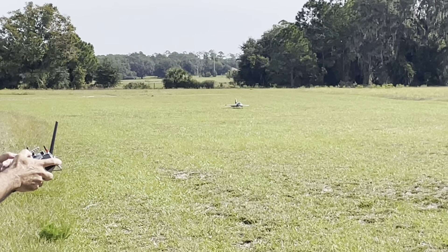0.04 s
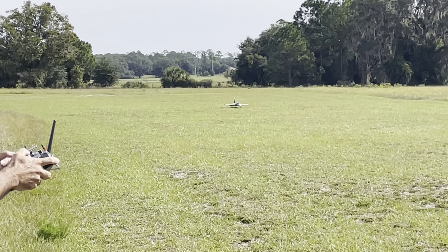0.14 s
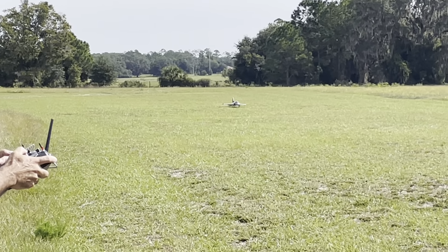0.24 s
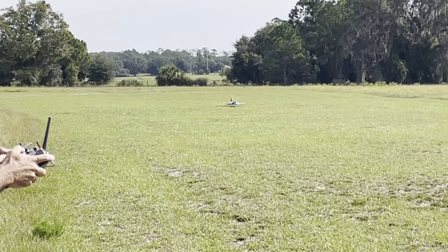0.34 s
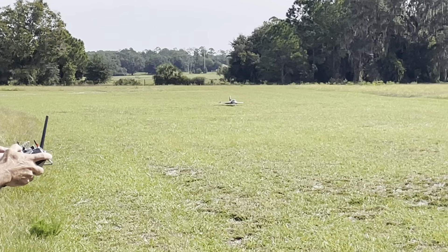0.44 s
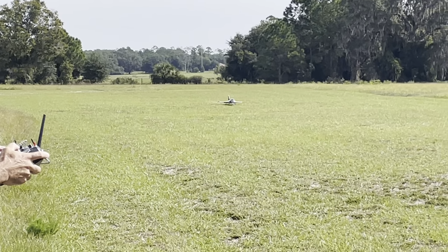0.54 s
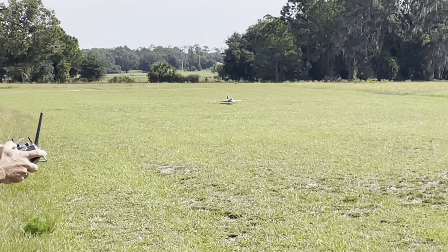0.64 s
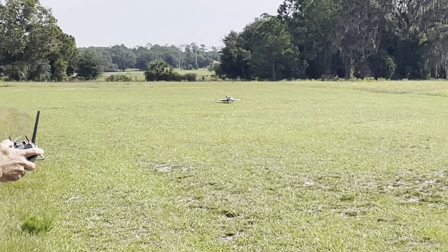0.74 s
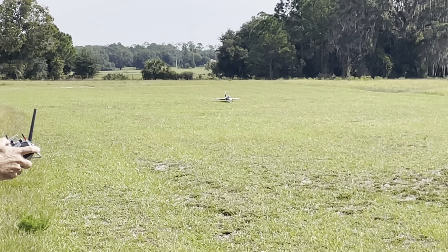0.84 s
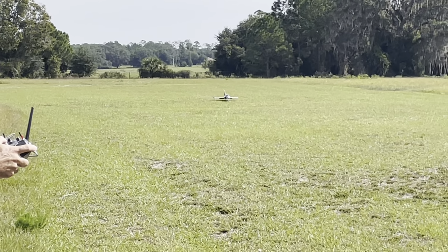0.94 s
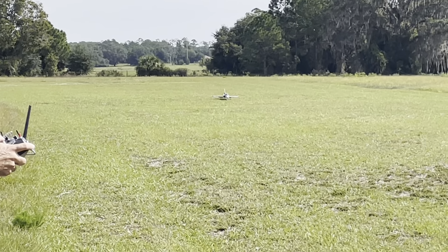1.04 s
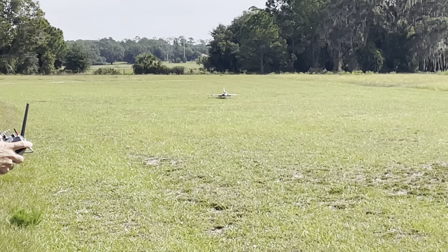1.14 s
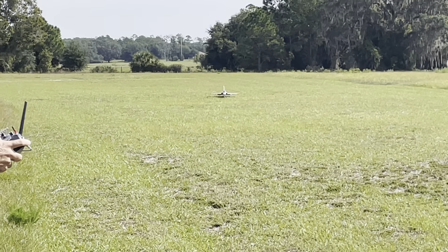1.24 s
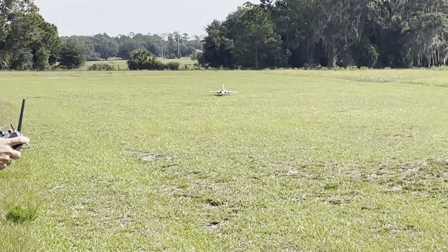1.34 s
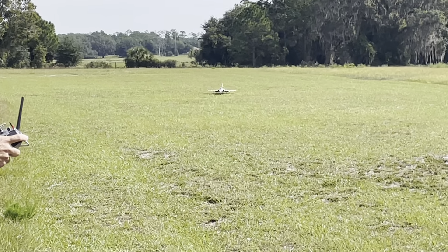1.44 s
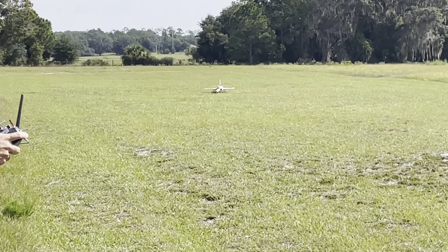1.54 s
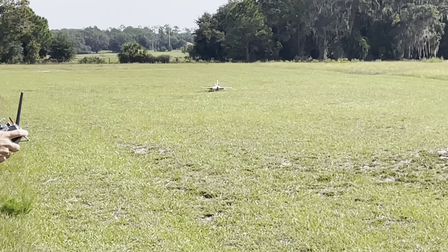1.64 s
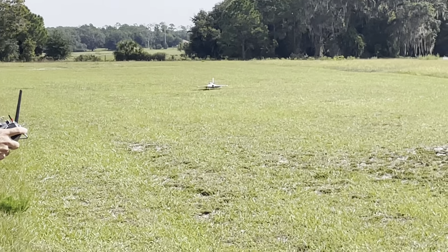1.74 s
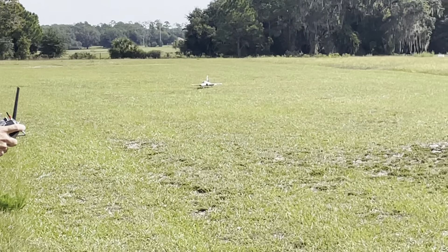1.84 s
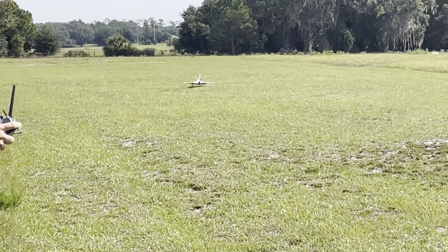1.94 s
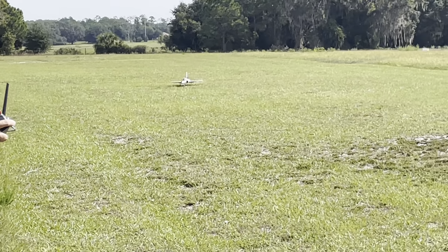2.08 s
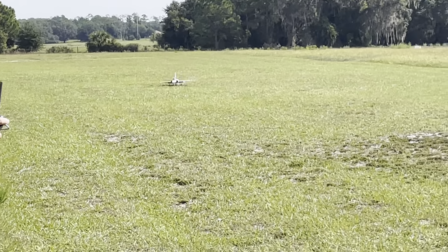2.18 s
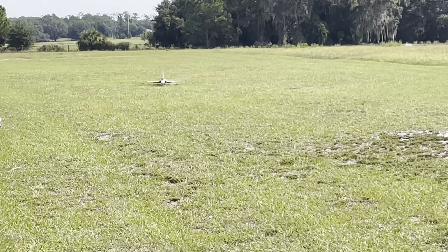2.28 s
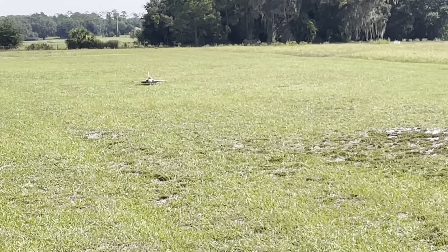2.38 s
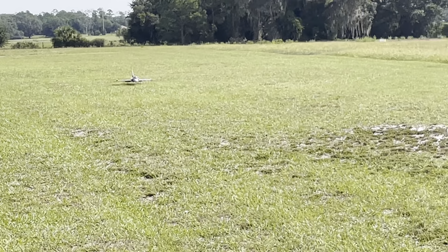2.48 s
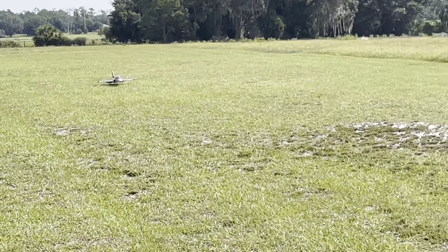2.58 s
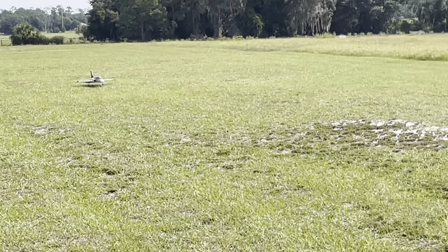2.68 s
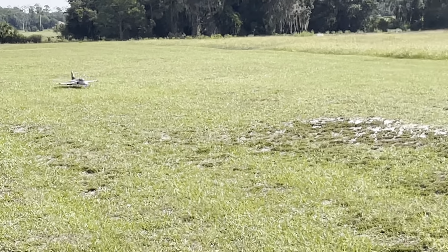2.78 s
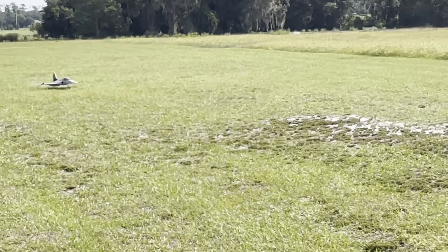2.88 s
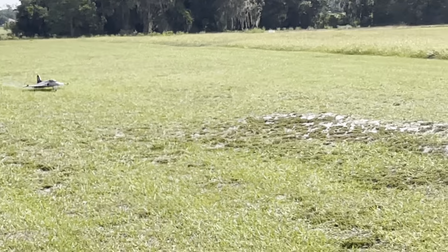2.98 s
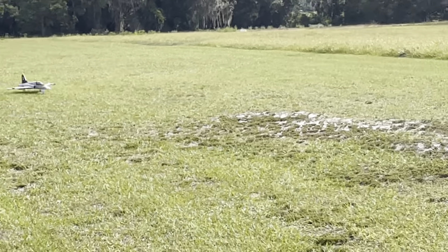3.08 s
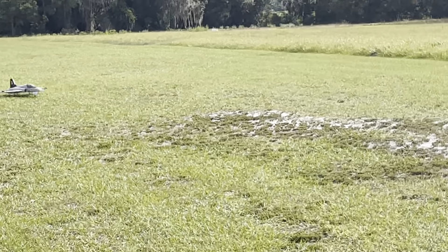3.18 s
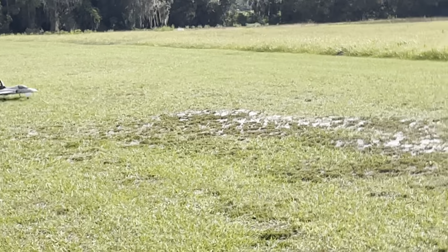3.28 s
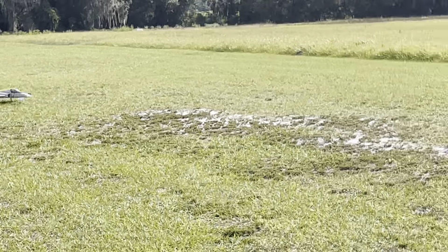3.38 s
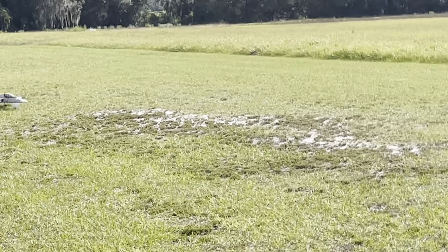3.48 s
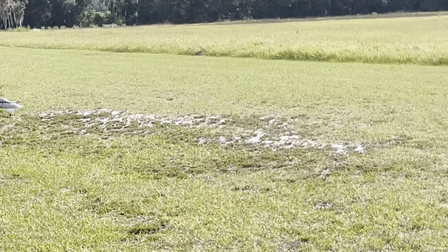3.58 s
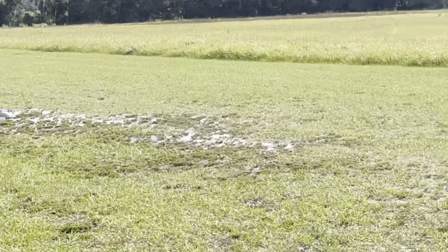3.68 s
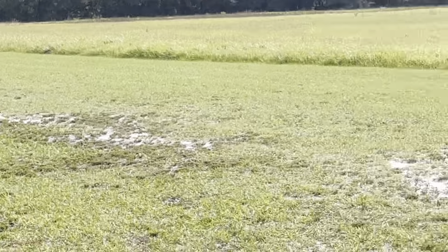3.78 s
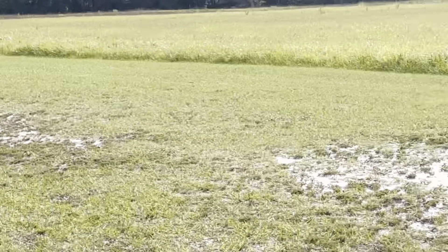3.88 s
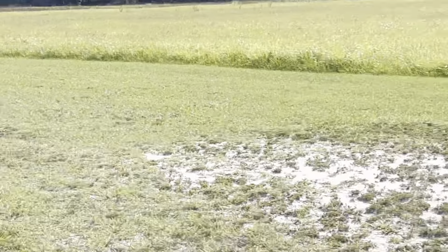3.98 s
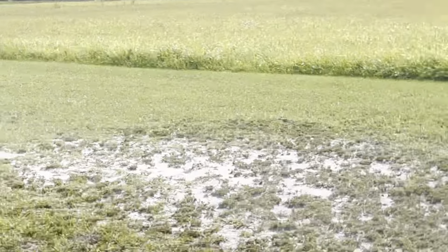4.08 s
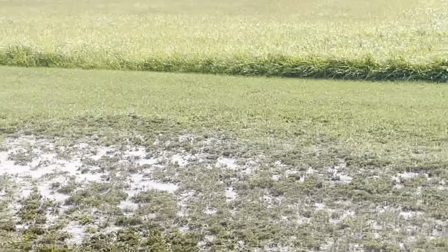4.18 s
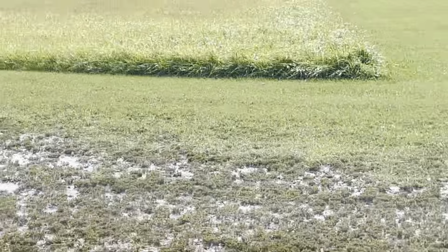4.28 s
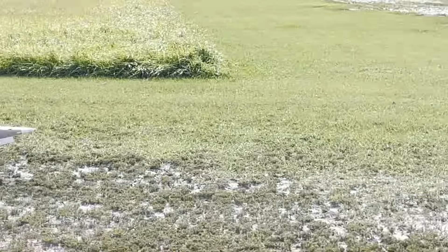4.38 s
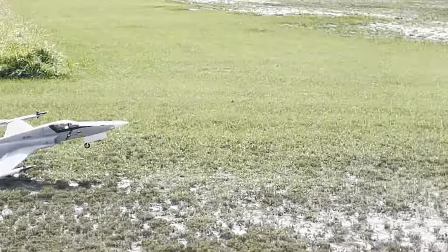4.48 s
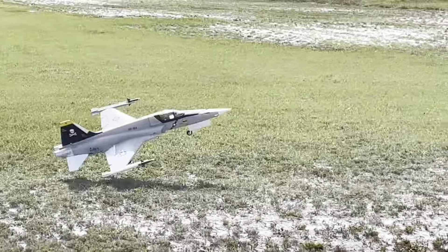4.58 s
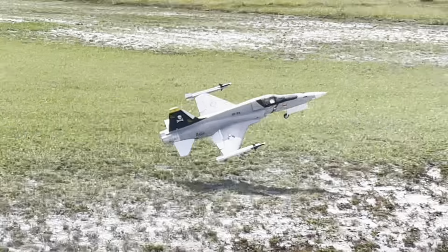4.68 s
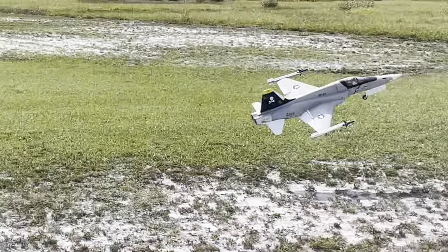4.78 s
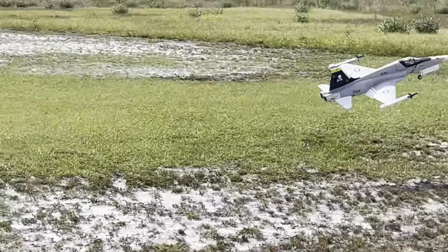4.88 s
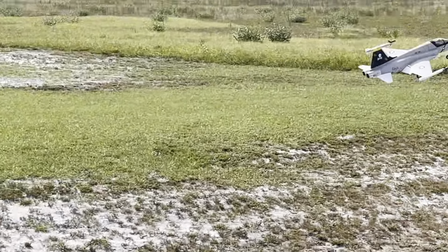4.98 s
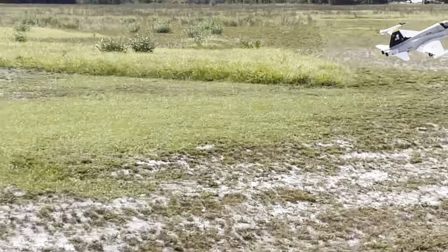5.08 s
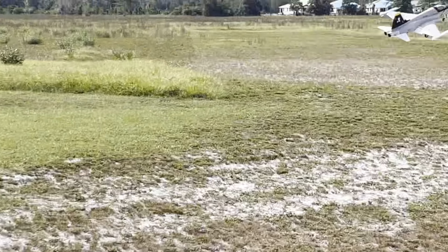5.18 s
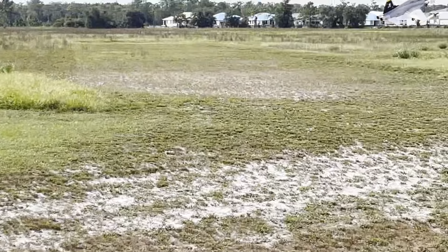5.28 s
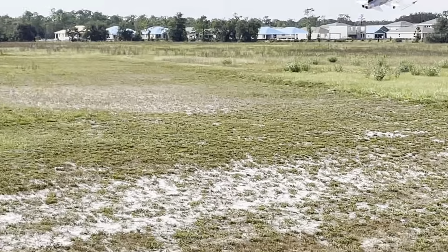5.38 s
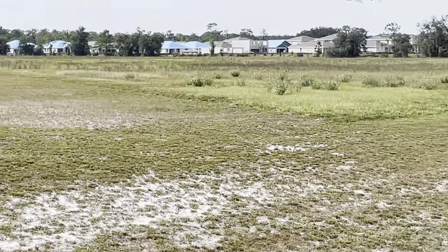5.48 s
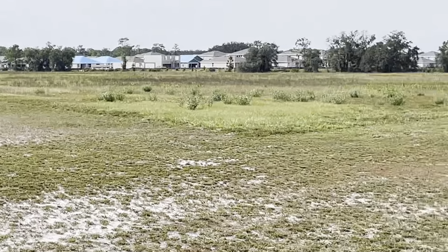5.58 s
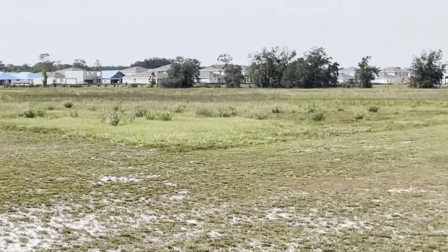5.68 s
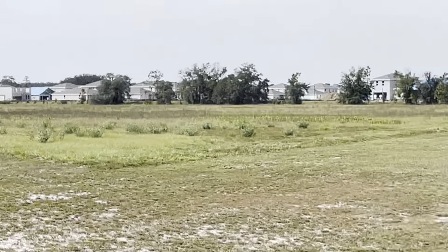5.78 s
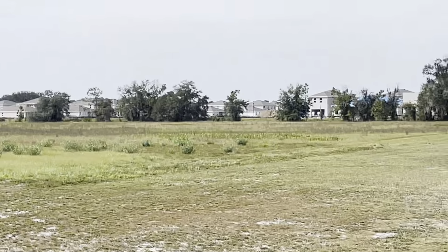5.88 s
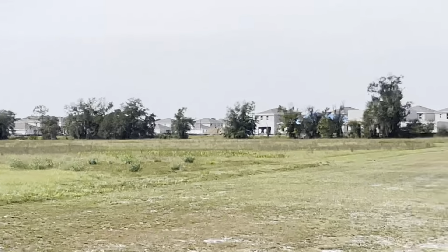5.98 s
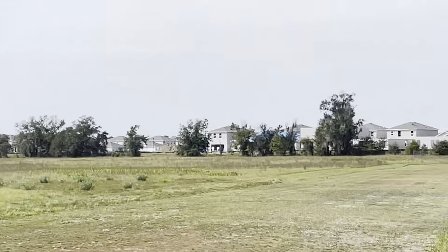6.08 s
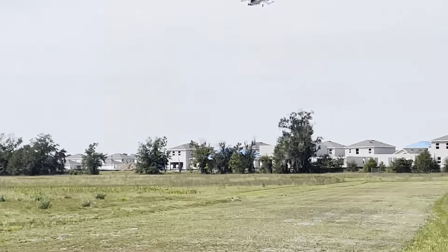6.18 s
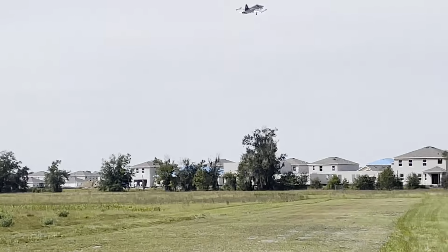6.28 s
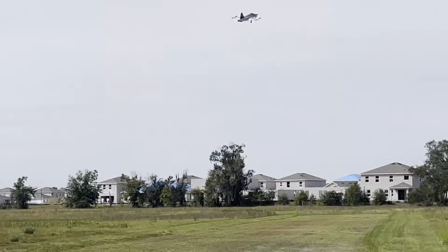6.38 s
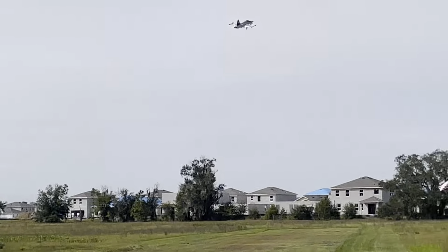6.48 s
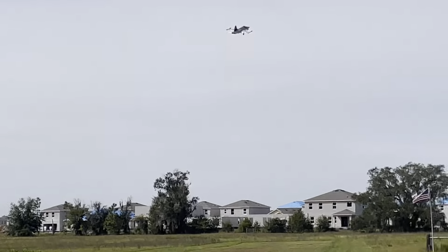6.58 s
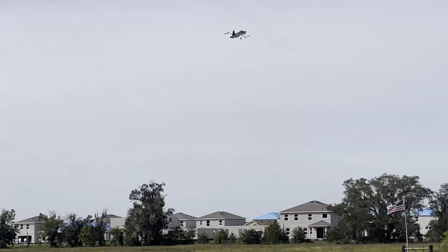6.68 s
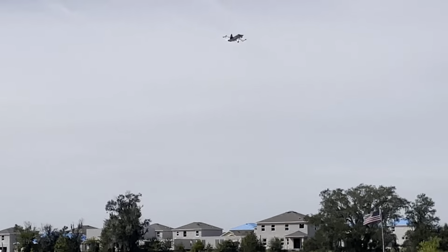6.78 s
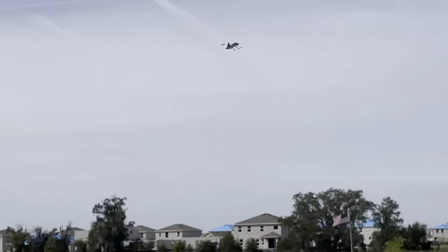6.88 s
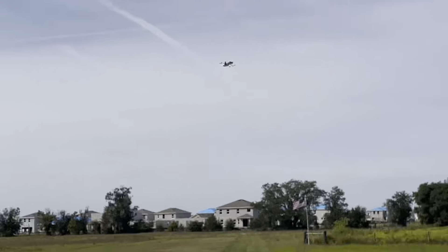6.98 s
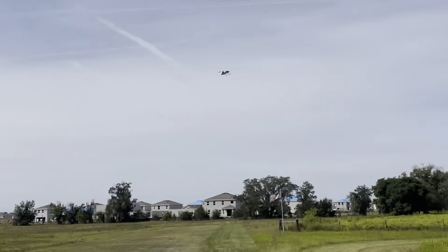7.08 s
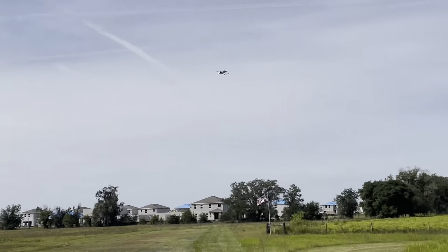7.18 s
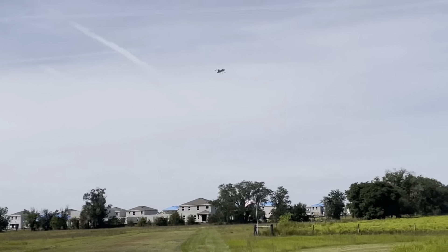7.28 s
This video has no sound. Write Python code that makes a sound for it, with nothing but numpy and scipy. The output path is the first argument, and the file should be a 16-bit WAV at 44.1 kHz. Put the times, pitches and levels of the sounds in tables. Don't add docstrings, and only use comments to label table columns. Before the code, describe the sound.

Outdoors on a grassy field, a small electric ducted-fan jet starts far off, thin and quiet under wind puffs and a distant propeller drone. Its whine climbs in steps, then rushing air swells as it races close past the microphone around four and a half seconds. The pitch falls sharply as it lifts off, and the hollow, shifting roar recedes into the sky.

```python
import sys
import numpy as np
from scipy import signal
from scipy.fft import rfft, irfft, next_fast_len
from scipy.io import wavfile
from scipy.ndimage import uniform_filter1d, map_coordinates

SR = 44100
rng = np.random.default_rng(int(sys.argv[2]) if len(sys.argv) > 2 else 0)


def file_out(sig):
    cols = np.atleast_2d(sig).T
    lim = np.clip(cols, -1, 1)
    pcm = np.round(lim * 32767).astype(np.int16)
    wavfile.write(sys.argv[1], SR, pcm)


def ratio(d):
    e = np.asarray(d, float) / 20
    return 10 ** e


N = 323694
T = np.arange(N) / SR
SLOW_T = T[::128]
BLADES = 12


def evened(x):
    return x / np.sqrt(np.mean(x ** 2) + 1e-20)


def read(points, hz):
    f, value = np.transpose(points)
    return np.interp(np.log(hz + 1), np.log(f + 1), value)


def columns(rows, t=T):
    s, *values = np.transpose(rows)
    return [np.interp(t, s, v) for v in values]


def coloured(x, gain):
    size = next_fast_len(N + 4096)
    return irfft(rfft(x, size) * gain(np.fft.rfftfreq(size, 1 / SR)), size)[..., :N]


def wander(hz):
    return evened(coloured(rng.standard_normal(N), lambda f: 1 / (1 + (f / hz) ** 4)))


def tone(turns, flutter_db, flutter_hz=25):
    level = ratio(flutter_db * wander(flutter_hz))
    phase = 2 * np.pi * turns + 0.13 * flutter_db * wander(flutter_hz)
    return np.sqrt(2) * level * np.sin(phase)


def whistle(hz, width_hz):
    phase = 2 * np.pi * np.cumsum(hz * np.ones(N)) / SR
    return evened(wander(width_hz / 2) * np.cos(phase) + wander(width_hz / 2) * np.sin(phase))


def fade_db(dips, t=T):
    depth_db = sum(db * np.exp(-((SLOW_T - s) / half_s) ** 2) for s, db, half_s in dips)
    return np.interp(t, SLOW_T, depth_db)


# (start [s], length [s], shaft speed reached [Hz])
THROTTLE = [(.01, .1, 423), (.25, .07, 431), (.39, .1, 452), (.53, .08, 462), (.64, .1, 468),
            (1.11, .12, 485), (1.26, .09, 498), (1.48, .08, 510), (1.61, .1, 525), (2.08, .09, 537),
            (2.35, .08, 548), (2.57, .16, 579.5), (2.8, .09, 597.5), (5.29, .045, 560), (5.335, .055, 546),
            (5.39, .11, 527), (7.2, .06, 534)]
# (time [s], speed [m/s])
APPROACH = [(0, 0), (3.05, 12.4), (3.5, 11.9), (3.9, 9.2), (4.15, 7.6), (4.5, 2.7), (4.9, -11.4),
            (5.07, -15.9), (5.27, -19), (5.9, -20.3), (6.15, -22.5), (6.85, -24), (7.34, -24)]


def shaft_hz():
    idle_hz, spool_s, sound_m_per_s = 410, .04, 343
    start, length, reached = np.transpose(THROTTLE)
    progress = np.clip((T[::64] - start[:, None]) / length[:, None], 0, 1)
    steps = np.diff(reached, prepend=idle_hz) @ progress
    spun = uniform_filter1d(np.interp(T, T[::64], idle_hz + steps), round(spool_s * SR))
    return spun / (1 - columns(APPROACH)[0] / sound_m_per_s)


# (time [s], level [dB])
NEAR = [(0, -36.5), (.6, -34.5), (1.3, -33), (1.75, -31), (2.45, -29.5), (2.8, -24), (3.3, -21),
        (3.5, -18.5), (3.85, -13), (4.3, -13), (4.5, -14.5), (4.8, -13), (5.25, -13.5), (5.45, -17),
        (6, -21), (6.5, -23.5), (7.1, -24.5), (7.34, -26.5)]
# (time [s], share of tail pipe facing [0-1], notch [Hz], notch depth [dB])
CLIMB = [(0, 0.23, 2350, -1.5), (2.4, 0.06, 2740, 10), (3.3, 0.35, 2583, 2), (3.7, 0.1, 2580, 1.5),
         (4.4, 0.31, 3240, -0.5), (4.8, 0.82, 3060, 5), (5.6, 0.6, 3220, 5), (6.3, 1, 3040, -1),
         (7.34, 0.93, 2710, 4)]
# (time [s], level [dB])
WAKE = [(0, 2), (1.2, 0.9), (2.3, 4.5), (2.7, 0), (3.3, .5), (3.7, 0), (4.35, 3), (4.8, -1.5), (5.05, 1),
        (5.4, -4), (6.3, 1), (7.34, 2.5)]
# (time [s], depth [dB], half width [s])
EDDIES = [(2.3, 8, 0.14), (2.55, 4, 0.085), (3.1, 1, 0.085), (3.3, 2.5, .06), (3.5, 2, .04), (4.1, 0, 0.03),
          (4.45, 1.5, 0.075), (5.65, 2, 0.054), (5.95, -1, 0.03), (6.12, 2.5, 0.088), (6.25, 0.5, .04),
          (6.42, 6, 0.087), (7.27, 7.5, 0.083)]
# (offset [dB], slope [dB per dB of nearness],
# gain with the tail pipe facing [dB], share of the eddies' dips, share of the wake)
LAYERS = [
    (-1.5, 0.8432, -13.5, 0.12, 0.77),
    (2, 1.273, -0.4, 0.067, 0.43),
    (0.26, 1.0352, 0.15, 0.35, 0.051),
    (10.5, 1.5, -2.5, 1.74, 0.27),
]


def flow_db(t=T):
    near_db, facing, wake_db = columns(NEAR, t)[0], columns(CLIMB, t)[0], columns(WAKE, t)[0]
    return [db + slope * near_db + tail_db * facing - dimmed * fade_db(EDDIES, t) + stirred * wake_db
            for db, slope, tail_db, dimmed, stirred in LAYERS]


FLOW_HZ = [380, 1250, 4500, 11000]
# (frequency [Hz], level [dB])
JET = [(40, -0.5), (140, -6), (400, -2), (750, -2.5), (1500, -7), (2100, -10), (2600, -14), (3100, -9.5),
       (3700, -12.5), (4600, -13.5), (6000, -10.5), (8000, -10.5), (12000, -21), (15500, -24.5)]


def rush():
    hz, t, z = signal.stft(rng.standard_normal(N), SR, nperseg=1024, noverlap=768)
    f = hz[:, None]
    facing, notch_hz, notch_db = columns(CLIMB, t)
    levels = np.array(flow_db(t))
    place = np.interp(np.log(hz + 1), np.log(FLOW_HZ), np.arange(4))
    level_db = np.maximum(1 - abs(place[:, None] - np.arange(4)), 0) @ levels
    level_db = level_db + 0.25 * np.clip(f / 3000 - 3.6, 0, 1) * (levels[-1] + 15)

    grain = rng.standard_normal((len(t), len(hz)))
    patches = evened(uniform_filter1d(uniform_filter1d(grain, 18, 0), 16, 1)).T
    flicker = np.clip(f / 7000, .15, .8) * wander(9.2)[np.minimum(np.arange(len(t)) * 256, N - 1)]
    shimmer_db = 1.5 * patches + 1.08 * (0.34 + facing) * flicker

    pipe_hz, pipe_width_hz, pipe_db = 6300, 450, 5.5
    pipe = pipe_db * np.exp(-((f - pipe_hz) / pipe_width_hz) ** 2) * facing

    def bump(centre_hz, width_hz=400):
        return np.exp(-((f - centre_hz) / width_hz) ** 2)

    graze = bump(notch_hz) - 0.6 * bump(1.48 * notch_hz)
    graze = graze - 0.36 * bump(.55 * notch_hz) + 0.17 * bump(0.3 * notch_hz)
    graze = notch_db * graze + 8 * facing * bump(3170, 130)
    z = z * ratio(read(JET, hz)[:, None] + level_db + shimmer_db + pipe - graze)
    return signal.istft(z, SR, nperseg=1024, noverlap=768)[1][:N]


def moan(hz):
    roar_db, facing = flow_db()[1], columns(CLIMB)[0]
    return ratio(roar_db - 22) * facing ** 2 * whistle(2.7 * hz, 45)


# (time [s], shaft order, depth [dB], half width [s])
FADES = [(2.75, 1, 9, .08), (5.04, 1, 15, .06), (.9, 2, 9, .4), (2, 2, 4, .5), (.55, 3, -6, .5),
         (1.9, 3, 4, .6), (4.05, 5, -4, .35), (6.2, 3, -4, .25), (4.57, 2, 17, .05), (4.2, 2, -4, .3),
         (6.14, 2, 4, .06), (4.3, 3, -9, .22), (4.6, 3, 12, .06), (4.85, 3, 5, .06), (5.02, 3, 14, .07),
         (5.78, 3, 9, .09), (6.62, 3, 5, .1), (7.3, 3, -5, .1), (4, 4, 20, .15), (4.5, 4, 7, .06),
         (5.15, 4, 9, .05), (5.8, 4, 7, .1), (6.95, 4, 15, .2), (1.6, 5, 14, 1.1), (4.95, 5, 8, .1),
         (5.45, 5, 14, .08), (5.7, 5, -4, .1), (5.92, 5, 12, .05), (6.6, 5, 18, .07), (6.95, 5, -4, .2)]


def order_fade_db(order):
    return fade_db([(s, db, half_s) for s, k, db, half_s in FADES if k == order])


# (time [s], level [dB])
IMBALANCE = [(0, -65), (.45, -66), (.6, -52.5), (1.1, -52.5), (1.25, -49), (1.8, -40.5), (2.3, -41),
             (2.6, -48), (3, -37), (3.5, -26), (4.2, -19), (4.5, -11.5), (4.65, -12.5), (4.9, -32),
             (5.4, -32), (6.1, -36.5), (6.7, -40), (7.34, -45.5)]
# (offset [dB], slope [dB per dB of nearness], gain with the tail pipe facing [dB])
OVERTONES = [
    (-16.5, 1.51, 5),
    (-25.5, 1.34, 9),
    (-21, 2.13, 14.5),
    (-30, 1.4, 3.5),
]


def shaft(turns):
    near_db, facing = columns(NEAR)[0], columns(CLIMB)[0]
    levels = columns(IMBALANCE)
    levels += [db + slope * near_db + tail_db * facing for db, slope, tail_db in OVERTONES]
    return sum(ratio(db - order_fade_db(k + 1)) * tone((k + 1) * turns, 0.39 + 0.29 * k)
               for k, db in enumerate(levels))


# (time [s], level [dB])
BEAM = [(0, -64), (.4, -57.5), (1.3, -54), (2.4, -58.5), (2.7, -46.5), (3.4, -32), (3.7, -34.5),
        (3.9, -24.5), (4.2, -23), (4.5, -32.5), (5.2, -27), (5.5, -40), (6, -42.5), (6.3, -73), (7.34, -68)]
# (time [s], depth [dB], half width [s])
BLADE_DIPS = [(.2, 10, .08), (.72, 7, .07), (1.2, 7, .06), (1.68, 8, .07), (1.93, 6, .06), (2.42, 18, .06),
              (3.22, 12, .08), (4.87, 8, .02), (5.07, 10, .02), (5.36, 16, .04), (5.55, 4, .06),
              (5.7, 6, .06)]
# (time [s], depth [dB], half width [s])
OCTAVE_DIPS = [(.05, -12, .25), (.9, -8, .5), (1.6, 5, .15), (1.95, 4, .1), (2.45, -4, .2), (4.1, -3, .3),
               (5, 3, .3), (5.95, 5, .06), (7.2, 14, .4)]


def blade_whine(turns):
    near_db, facing = columns(NEAR)[0], columns(CLIMB)[0]
    blade_db = columns(BEAM)[0] - fade_db(BLADE_DIPS)
    octave_db = 1.56 * near_db - 28 + 2.3 * facing - fade_db(OCTAVE_DIPS)
    whine = ratio(blade_db) * tone(BLADES * turns, 2.3, 22.0)
    return whine + ratio(octave_db) * tone(2 * BLADES * turns, 3, 9)


# (multiple of shaft speed, level relative to the inlet rush [dB])
UNEVEN = [(6, -35), (7, -33), (8, -35), (9, -35), (10, -36), (11, -33), (13, -38)]


def uneven_blades(turns):
    inlet_db, facing = flow_db()[2], columns(CLIMB)[0]
    orders = sum(ratio(inlet_db + db) * tone(k * turns, 2.8, 4) for k, db in UNEVEN)
    return orders * (.12 + .9 * facing ** 2)


# (time [s], frequency [Hz])
FIRING = [(0, 84), (2, 81.7), (4, 80), (5.3, 78.7), (7.34, 76.3)]
# (time [s], level [dB])
DRONE_DB = [(0, -45), (1.1, -42), (3.4, -38.5), (4, -38), (5.1, -38), (6.2, -42), (7.34, -39.5)]
# (level at the start [dB], level at the end [dB], slow fading [dB])
DRONE_ORDERS = [
    (0, -0.7, 2.5),
    (-20.5, -12.5, 2.3),
    (-27.5, -17.5, 2.5),
    (-27.5, -15.5, 2),
]


def drone():
    turns = np.cumsum(columns(FIRING)[0]) / SR
    engine = np.zeros(N)
    for k, (first_db, last_db, fading_db) in enumerate(DRONE_ORDERS):
        order_db = first_db + (last_db - first_db) * T / T[-1] + fading_db * wander(0.81)
        engine += ratio(columns(DRONE_DB)[0] + order_db) * tone((k + 1) * turns, 0.84, 5.3)
    return engine


# (frequency [Hz], level [dB], drift [dB/s], time of masking [s], masking depth [dB])
HUM = [
    (130.7, -51.5, -1.54, 4.7, 5.5),
    (90.3, -51, -0.34, 3.2, 20.5),
]


def hum():
    return sum(ratio(db + drift_db * T - fade_db([(s, dip_db, 1.7)])) * tone(f * T, 2.2, 2.5)
               for f, db, drift_db, s, dip_db in HUM)


# (time [s], level [dB], half width [s])
GUSTS = [(.2, -47, 0.55), (.65, -31, 0.045), (.95, -34, 0.15), (1.15, -39, 0.089), (1.3, -41, 0.086),
         (1.75, -40.5, .05), (2, -35.5, 0.077), (2.25, -29.5, .15), (2.48, -39, 0.089),
         (2.792, -35.5, 0.053), (3.19, -34.5, 0.12), (3.35, -33, 0.1), (3.529, -26, 0.067),
         (3.7, -36, 0.13), (4.25, -32, 0.093), (4.42, -42, 0.098), (4.65, -45, .12), (5.6, -40, 0.072),
         (6.5, -46, 0.21), (6.85, -46, 0.21), (7.2, -44, .2)]
# (frequency [Hz], level [dB])
BUFFET = [(15, -30), (30, -41), (50, 0.5), (70, 2.5), (110, -5.5), (200, -16.5), (400, -46)]


def wind():
    puffs = rng.standard_normal(N) * ratio(2.5 * wander(22))
    breeze_db = -48
    gusts = ratio(breeze_db) + sum(ratio(db) * np.exp(-((SLOW_T - s) / half_s) ** 2) for s, db, half_s in GUSTS)
    buffeting = evened(coloured(puffs, lambda hz: ratio(read(BUFFET, hz))))
    return np.interp(T, SLOW_T, gusts) * ratio(-5.0) * buffeting


# (time [s], delay [ms], strength [0-1], phase lag [rad])
ECHO = [(4.2, 0.22, 0.11, -0.79), (4.55, 0.44, 0.21, -1.7), (4.8, 0.56, 0.15, -0.72),
        (4.95, 0.59, 0.44, 0.58), (5.15, 0.88, 0.33, 1.5), (5.4, 1.21, 0.62, 0.77), (5.7, 1.53, 0.5, 0.37),
        (5.9, 1.64, 0.34, 1), (6.3, 1.94, 0.3, 0.45), (6.6, 2.12, .45, 0.53), (6.9, 2.24, 0.6, 0.45),
        (7.34, 2.54, 0.3, -0.092)]


def ground(x):
    dull_hz = 6000
    delay_ms, strength, lag = columns(ECHO)
    late = map_coordinates(x, [np.arange(N) - delay_ms * SR / 1000], order=3)

    def dull(hz):
        return 1 / np.sqrt(1 + (hz / dull_hz) ** 2)

    quarter_turned = coloured(late, lambda hz: -1j * dull(hz))
    late = np.cos(lag) * coloured(late, dull) + np.sin(lag) * quarter_turned
    return (x + strength * late) / np.sqrt(1 + strength ** 2)


# (frequency [Hz], lead [half turns])
LEAD = [(20, .06), (250, .07), (600, .13), (900, .06), (1200, .2), (1740, .3), (1950, 0), (5650, 0),
        (6800, -.3), (8000, -1), (8550, -1), (9100, -1.25), (10900, -2), (12350, -2), (13700, -2.75),
        (14700, -3), (20000, -3)]
# (frequency [Hz], level relative to the shared sound [dB])
APART = [(40, -18), (140, -15.5), (500, -18), (1700, -19), (2200, -19), (5600, -23.5), (7000, 1),
         (8200, -24), (9800, -26), (11500, -22), (13000, -7), (14200, -15)]


def scene():
    hz = shaft_hz()
    turns = np.cumsum(hz) / SR
    whine = shaft(turns) + blade_whine(turns) + uneven_blades(turns)
    air = ground(moan(hz) + rush()) + wind()
    sides = np.array([[1], [-1]])
    own = coloured(air * np.sign(wander(60)), lambda hz: ratio(read(APART, hz)))
    field = whine + air + drone() + hum() + sides * own
    ports = coloured(field, lambda hz: np.exp(.5j * np.pi * sides * read(LEAD, hz)))
    return ports * ratio(-.2 * sides)


def low_pass(x):
    return signal.sosfilt(signal.butter(12, 15700, fs=SR, output="sos"), x)


def record(dry):
    cut = signal.sosfilt(signal.butter(4, 42, "high", fs=SR, output="sos"), dry)
    return low_pass(cut)


dry = scene()
out = record(dry)
file_out(out)
```